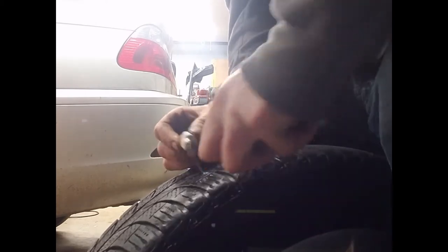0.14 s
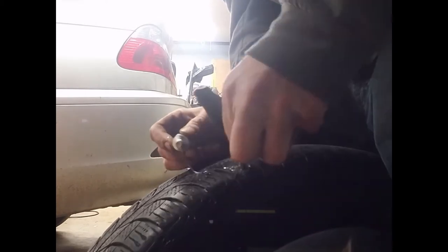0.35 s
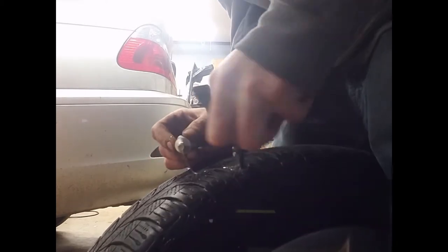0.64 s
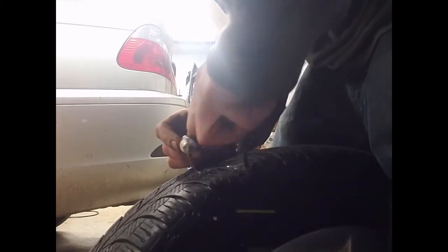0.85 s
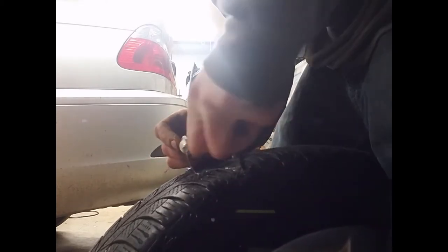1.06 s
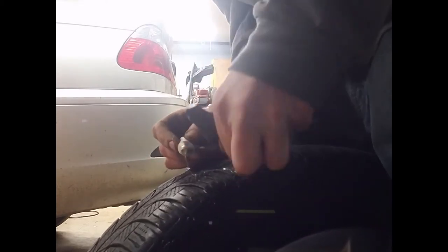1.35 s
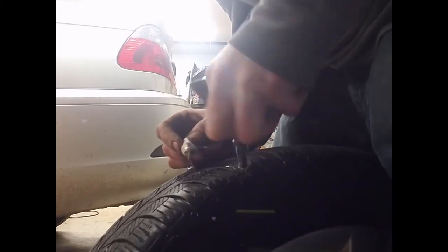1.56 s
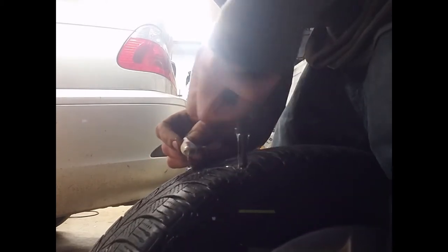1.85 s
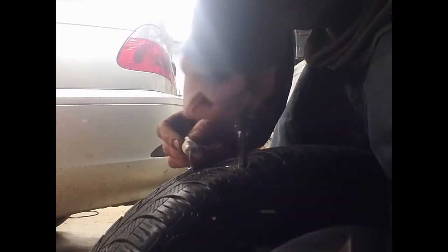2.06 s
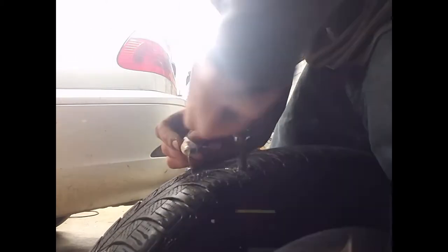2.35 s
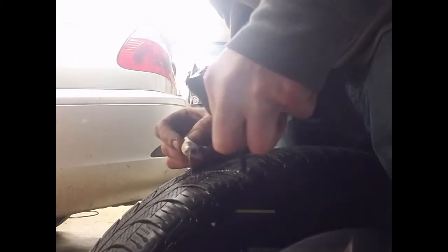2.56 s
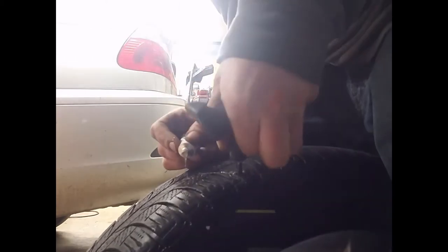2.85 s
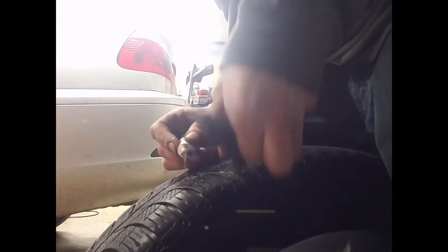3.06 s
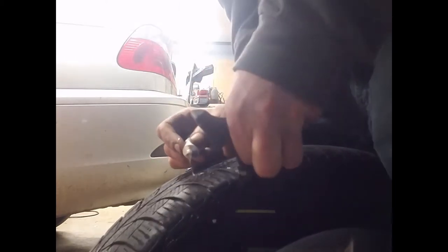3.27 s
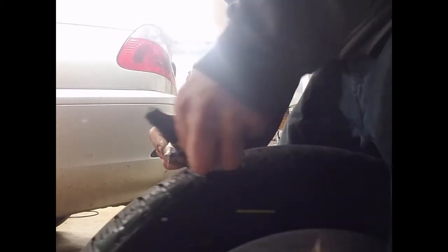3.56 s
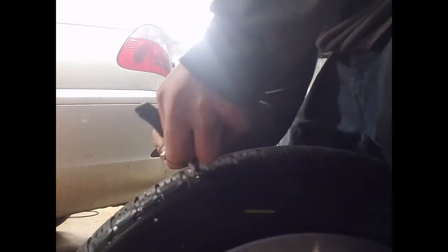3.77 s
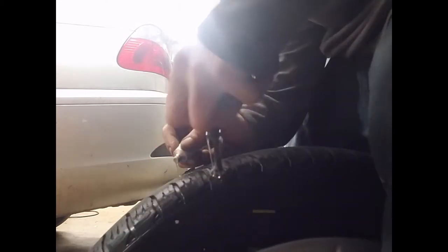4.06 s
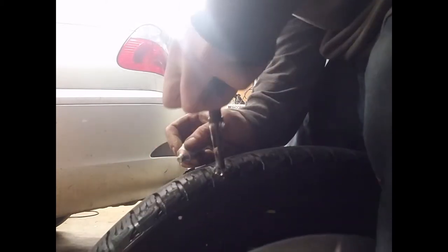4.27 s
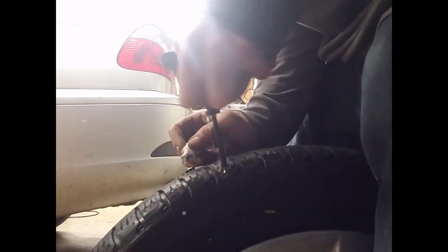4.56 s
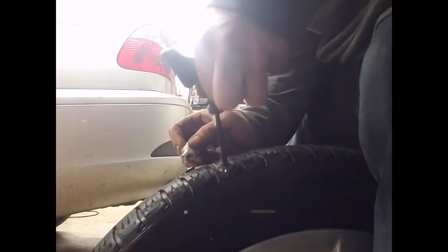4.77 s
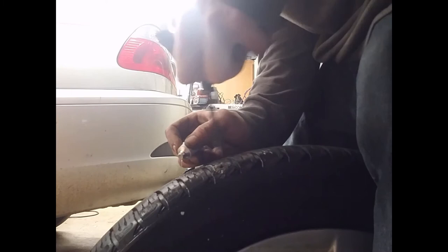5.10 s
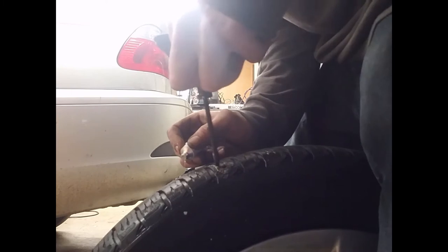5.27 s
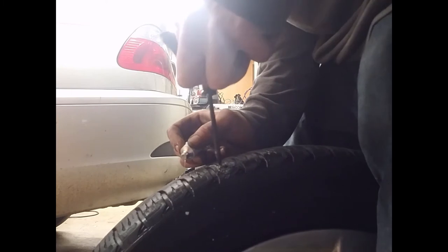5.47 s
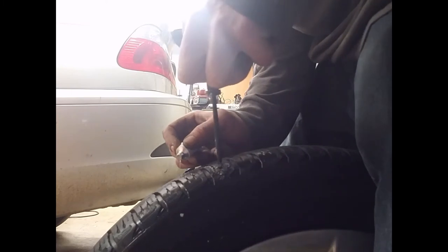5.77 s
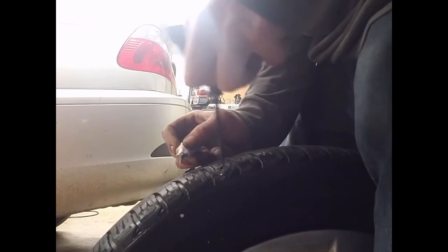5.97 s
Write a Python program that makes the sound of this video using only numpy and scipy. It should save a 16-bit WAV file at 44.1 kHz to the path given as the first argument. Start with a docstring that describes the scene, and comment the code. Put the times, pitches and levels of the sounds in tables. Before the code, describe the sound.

Air fizzes and spurts from a punctured tire as a tool twists in the hole, knocks hard, then settles into a rushing hiss.

```python
"""Outdoors, two microphone ports: air already fizzes and whistles from a punctured tire around a rasp tool.
As the tool is pushed and twisted the gap spurts, whistles and is pinched; from 1.2 s its teeth knock the tire.
Near 2.9 s hard knocks come with a low rush and a jolt that leaves the air ring singing; at 4.2 s the teeth
leave the hole and the flutter calms; from 4.8 s the wide gap rushes on to the end.
The jet is filtered noise in three bands, whistles are gliding tones, knocks and carcass excite tire modes."""
import sys
import numpy as np
from scipy import signal
from scipy.fft import rfft, irfft, next_fast_len
from scipy.io import wavfile
from scipy.ndimage import uniform_filter1d, map_coordinates

SR = 44100
rng = np.random.default_rng(int(sys.argv[2]) if len(sys.argv) > 2 else 0)


def file_out(sig):
    """Save sig as 16-bit WAV at sys.argv[1]."""
    # one column per channel
    cols = np.atleast_2d(sig).T
    # limit, then scale
    lim = np.clip(cols, -1, 1)
    pcm = np.round(lim * 32767).astype(np.int16)
    wavfile.write(sys.argv[1], SR, pcm)


N = 270553
TIME = np.arange(N) / SR  # s
GRID = next_fast_len(N + SR // 4)  # FFT length, padded for the tails
HZ = np.fft.rfftfreq(GRID, 1 / SR)

# low rush of the jet through the wide side of the gap, before wobble: t/s, level/dB
RUSH_LEVELS = [(0, -42.5), (.11, -43.5), (.25, -52), (.5, -53.5), (.95, -53.5), (1.02, -42), (1.07, -42),
               (1.1, -45), (1.23, -53), (1.265, -41), (1.31, -45.5), (1.41, -49), (1.65, -57),
               (1.88, -51.5), (2.1, -56.5), (2.19, -46), (2.33, -39.5), (2.37, -45.5), (2.64, -43.5),
               (2.86, -45.5), (2.93, -27.5), (2.97, -29.5), (3.01, -31), (3.07, -43.5), (3.11, -48),
               (3.5, -44.5), (3.8, -45.5), (3.93, -48), (4.38, -53.5), (4.68, -51.5), (4.752, -46),
               (4.764, -37), (4.785, -28.5), (4.82, -32), (4.855, -31), (4.9, -34), (4.98, -31.5),
               (5.17, -37), (5.6, -34.5), (5.74, -34), (5.78, -36), (5.8, -40), (5.83, -33), (6, -35.5),
               (6.14, -34)]


def amp(db):
    """Gain of a level in dB."""
    return 10 ** (np.asarray(db) / 20)


def unit(x):
    """Scale so that the mean of the channels has rms 1."""
    return x / np.sqrt(np.mean(np.atleast_2d(x).mean(0) ** 2))


def along(points):
    """Columns of (Hz, value, ..) rows on the log frequency grid."""
    hz, *columns = np.transpose(points)
    return np.array([np.interp(np.log(HZ + 1), np.log(hz + 1), column) for column in columns])


def curves(rows):
    """One value per sample for each column after the time."""
    s, *columns = np.transpose(rows)
    return [np.interp(TIME, s, column) for column in columns]


def wobble(rate):
    """A smooth random curve, rate knots a second."""
    knots = rng.standard_normal(int(N * rate / SR) + 4)
    return map_coordinates(knots, [TIME * rate])


def filtered(x, response):
    """x times a complex response on the frequency grid."""
    return irfft(rfft(x, GRID) * response, GRID)[..., :N]


def band(low_hz, high_hz):
    """Soft-edged pass band."""
    low_edge = 1 + (low_hz / (HZ + 1)) ** 6
    high_edge = 1 + (HZ / high_hz) ** 6
    return 1 / np.sqrt(low_edge * high_edge)


def panned(x, left_db):
    """Tilt a sound between the ports; positive dB leans left."""
    return x * amp(np.array([[.5], [-.5]]) * left_db)


def tire(low_hz, high_hz):
    """Causal response of the tire's modes between two frequencies, as resonators of alternating sign."""
    # carcass and air ring: f/Hz, width/Hz, level/dB
    modes = [(92.6, 26, -4), (144.6, 34, -0.5), (224.7, 6.3, -1.5), (370.6, 43, 11), (529, 16.5, 10),
             (747, 55, 4.5), (1133, 30, 0.5), (1532, 34, 0.5), (1966, 200, -2.5)]
    response = 0
    for k, (hz, width_hz, db) in enumerate(modes):
        if low_hz < hz < high_hz:
            damping = 1j * HZ * width_hz
            response = response + (-1) ** k * amp(db) * damping / (hz * hz - HZ * HZ + damping)
    return response


def scatter(level_db, t60):
    """Direct path plus near reflections off tread, hands and car body, different at each port, weak in bass."""
    left_lead_s = 6e-5  # these paths reach the left port first
    t = TIME[:SR // 8]
    tail = rng.standard_normal((2, len(t))) * amp(-60 * t / t60)
    tail /= np.linalg.norm(tail, axis=1, keepdims=True)
    strength = amp(level_db) * band(1860, SR)
    echoes = rfft(tail, GRID) * strength
    lead = np.exp(1j * np.pi * HZ * left_lead_s * np.array([[1], [-1]]))
    return lead * (1 + echoes) / np.sqrt(1 + strength ** 2)


def field(shape, bins_size, frames_size):
    """A random gain field of unit spread, smoothed over frequency bins and time frames."""
    smooth = uniform_filter1d(rng.standard_normal(shape), bins_size, axis=-2)
    smooth = uniform_filter1d(smooth, frames_size, axis=-1)
    return smooth / smooth.std()


def turbulence(colour, paths, patchy_db, streak_db):
    """Stereo noise: eddies come in patches, and moving hands shift narrow streaks of reflection.
    A common part takes the fixed paths, the rest is diffuse."""
    # how alike the two ports hear it: f/Hz, common share of power/1
    alike = [(400, 0.35), (1000, 0.44), (2000, 0.42), (4500, 0.62), (12000, 0.47), (15000, 0.64)]
    z = signal.stft(rng.standard_normal((3, N)), nperseg=512)[2]
    patches = patchy_db * field(z.shape[1:], bins_size=12, frames_size=4)
    streaks = streak_db * field(z.shape[1:], bins_size=2, frames_size=40)
    noise = signal.istft(z * amp(patches + streaks), nperseg=512)[1][:, :N]
    spectrum = rfft(noise, GRID)
    share = np.clip(along(alike), 0, 1)
    common = spectrum[0] * paths * np.sqrt(share)
    diffuse = spectrum[1:] * np.sqrt(1 - share)
    return unit(irfft(colour * (common + diffuse), GRID)[:, :N])


def jet(paths):
    """Three sizes of eddy share one gap; spurts and flutter lift the small eddies most."""
    # jet through the tight side of the gap, before spurts and flutter: t/s, fizz level/dB
    fizz_levels = [(0, -19.5), (.11, -30.5), (.21, -28.5), (.71, -26.5), (.95, -28), (1.01, -24),
                   (1.065, -25), (1.08, -17), (1.19, -15), (1.23, -20.5), (1.3, -30), (1.49, -28.5),
                   (1.65, -33), (1.76, -32), (1.88, -23.5), (2.08, -24), (2.19, -27), (2.54, -28.5),
                   (2.58, -33), (2.77, -25), (2.875, -27.5), (2.885, -17), (2.94, -26), (2.965, -16.5),
                   (3.06, -26), (3.15, -24), (3.21, -17.5), (3.35, -27), (3.62, -32), (3.66, -24.5),
                   (3.71, -23), (3.8, -25), (3.93, -24), (4.02, -23), (4.08, -29), (4.13, -26), (4.38, -25),
                   (4.75, -28), (4.79, -16), (4.92, -20.5), (6.14, -20.5)]
    # the hiss stands out or sinks between rush and fizz: t/s, level/dB
    hiss_offsets = [(0, 5), (.15, 3), (.4, -4.5), (1, -1.5), (1.25, 1), (1.29, -1.5), (1.32, -6.5),
                    (1.4, -8), (2.1, -3), (2.5, -2.5), (2.9, -4), (3.03, 6.5), (3.3, -5), (3.7, -6),
                    (4.4, -1.5), (4.82, -2.5), (6.14, -3.5)]
    # the jet swings and hands shade it: t/s, fizz toward left/dB, hiss toward left/dB
    aim = [(0, 8.5, 1.5), (.7, 9.5, -1), (1.2, 6.5, 1.5), (1.6, 9, 1), (2.4, 13, 0), (3.2, 3.5, 2.5),
           (3.5, 6.5, 1), (4.6, 7.5, 1.5), (6.14, 8.5, 1.5)]
    # the gap is squeezed for a moment: centre t/s, length/s, depth/dB
    pinches = [(0.9, 0.19, 5), (2.593, 0.11, 5), (2.699, 0.13, 11), (2.83, .05, 3.5), (3.007, 0.075, 8.5),
               (3.105, 0.061, 4.5), (4.47, 0.086, 4), (4.567, 0.057, 4), (4.647, 0.054, 3)]
    # the gap jerks open: t/s, rise before onset and fall/dB
    spurts = [(.196, 3.5), (0.59, 7), (.657, 4), (1.076, 6), (1.12, 2), (1.172, 1.5), (1.188, 4),
              (1.354, 2.5), (1.549, 5.5), (2.317, 7.5), (2.381, 1), (2.468, 7), (2.529, 6), (2.879, 0),
              (2.948, 6), (3.165, 7), (3.27, 6), (3.846, 5), (3.697, 3.5), (4.036, 6), (4.109, 3),
              (4.18, 0), (4.257, 2.5), (4.776, 7.5), (4.848, 6)]
    # relative colour of the jet at the microphone ports: f/Hz, left level/dB, right level/dB
    port_colour = [(254, -16, -20), (470, -28, -15), (1245, -10, -8), (2220, -13, -5.5), (2820, -6.5, -3),
                   (4400, -11.5, -3), (5200, -8.5, -0.5), (6400, -7.5, -10), (7970, -8, 0), (9200, -9, -6),
                   (10200, -9, 0), (10750, -7, 5), (11300, -8, 6), (12000, -4, -1), (13000, 0, -4),
                   (14000, 5.5, -4), (14620, 6.5, .5), (14750, -1, .5), (15000, 4.5, 1.5), (15400, 7.5, 6),
                   (15700, 6.5, 3.5)]
    hiss_share = 0.45  # the hiss lies between rush and fizz: weight of the rush
    pulled_out_s = 4.2  # the tool's teeth leave the hole and the flutter calms
    spurt_rise_s, spurt_fall_s = 0.00055, .018

    (fizz_db,), (rush_db,) = curves(fizz_levels), curves(RUSH_LEVELS)
    hiss_db = hiss_share * rush_db + (1 - hiss_share) * fizz_db + curves(hiss_offsets)[0]
    fizz_left, hiss_left = curves(aim)

    flow_db = 0.25 * wobble(20)
    for s, length, depth_db in pinches:
        squeeze = np.cos(np.pi * np.clip((TIME - s) / length, -.5, .5)).clip(0)
        flow_db -= depth_db * squeeze ** 1.66

    # rubber lips flutter against the teeth of the tool
    spurt_db = np.where(TIME < pulled_out_s, 1.5, .8) * wobble(85)
    t = TIME[:SR // 4]
    spurt_shape = np.exp(-t / spurt_fall_s) * (1 - np.exp(-t / spurt_rise_s))
    for s, rise_db in spurts:
        spurt_db[round(s * SR):][:len(t)] += rise_db * spurt_shape

    ports = amp(along(port_colour))
    fizz = turbulence(ports * band(8900, SR), paths, patchy_db=1.0, streak_db=2.0)
    hiss = turbulence(ports * band(3320, 9660), paths, patchy_db=1.5, streak_db=2.5)
    # the low rush also drives the tire's modes
    body = ports * band(110, 4500) * (1 + 2.0 * np.abs(tire(450, 2500)))
    rush = turbulence(body, paths, patchy_db=1.0, streak_db=0.07)

    fizz_db += spurt_db
    hiss_db += 0.39 * spurt_db + 0.66 * wobble(16)
    rush_db += 0.68 * spurt_db + 1.1 * wobble(22)
    eddies = amp(fizz_db) * panned(fizz, fizz_left)
    eddies += amp(hiss_db) * panned(hiss, hiss_left)
    eddies += amp(rush_db) * panned(rush, hiss_left)
    return amp(flow_db) * eddies


def whistles():
    """A slit beside the tool gives gliding tones of abrupt start; size and phase wander as fast as the blur."""
    # t/s, length/s, start f/Hz, end f/Hz, blur/Hz, level before wander/dB, toward left/dB
    slit_tones = [(0, 0.012, 4330, 4300, 300, -33, -14), (0.059, 0.023, 4400, 4480, 400, -40, -11),
                  (0.08, 0.058, 3950, 3700, 400, -41.5, -16), (0.104, 0.076, 7930, 7660, 610, -40, -7),
                  (0.137, 0.028, 3800, 3930, 161, -33.5, -18), (0.213, 0.036, 3730, 3830, 248, -36, -17),
                  (0.578, 0.016, 9500, 9100, 400, -41, -14), (0.591, 0.04, 8560, 8250, 398, -33, -11),
                  (0.696, 0.029, 11150, 10200, 494, -20, -12), (0.768, 0.008, 8800, 8700, 500, -34, -7),
                  (1.036, 0.053, 1900, 2600, 1493, -38, -7), (1.07, 0.015, 3320, 4120, 1500, -34, -14),
                  (1.188, 0.042, 8500, 6610, 1510, -27, 6), (3.043, 0.036, 7760, 7730, 597, -34, -3),
                  (4.716, 0.023, 10500, 10200, 200, -42, -10)]
    out = np.zeros((2, N))
    for s, length, start_hz, end_hz, blur_hz, db, left_db in slit_tones:
        u = np.linspace(0, 1, round(length * SR))  # progress through the tone
        waver = 0.0089 * map_coordinates(rng.standard_normal(20), [u * length * 150])
        glide_hz = end_hz + (start_hz - end_hz) * (1 - u) ** 3
        phase = 2 * np.pi * np.cumsum(glide_hz * (1 + waver)) / SR
        wander = rng.standard_normal((2, 200))
        in_phase, quadrature = [map_coordinates(knots, [u * length * blur_hz]) for knots in wander]
        tone = (0.67 + in_phase) * np.sin(phase) + quadrature * np.cos(phase)
        envelope = np.abs(np.sin(np.pi * u ** 0.51)) ** 0.55
        out[:, round(s * SR):][:, :len(u)] += panned(amp(db) * envelope * tone, left_db)
    return out


def carcass():
    """The rush keeps the low modes murmuring, jolts swell them; the air ring sings on after a hard jolt."""
    # hands jolt the tire: peak t/s, carcass level/dB
    jolt_levels = [(.07, -55), (.71, -75), (1.08, -56), (1.31, -67), (1.39, -48), (2.02, -70),
                   (2.46, -50.5), (2.949, -39.5), (3.29, -59), (3.62, -56), (3.7, -51), (3.86, -43),
                   (4.06, -49.5), (4.78, -58)]
    # the air ring sings on after a jolt: t/s, f/Hz, level before onset and decay/dB, t60/s
    air_ring = [(2.985, 222, -41, 1.1), (1.38, 222, -58, .8)]
    jolt_rise_s, jolt_fall_s = 0.034, 0.046
    murmur_db, follows = -61, 0.5  # level at the mean rush level; dB per dB of rush
    sidewall_db, sidewall_jolt_db = -13, -10.5  # relative to the rush; relative to a jolt

    rush_db, = curves(RUSH_LEVELS)
    jolts = np.zeros(N)
    for s, db in jolt_levels:
        distance = np.where(TIME < s, (s - TIME) / jolt_rise_s, (TIME - s) / jolt_fall_s)
        jolts += amp(db) * np.exp(-distance)
    low_gain = amp(murmur_db + follows * (rush_db - rush_db.mean())) + jolts
    wall_gain = amp(sidewall_db + rush_db) + amp(sidewall_jolt_db) * jolts

    # lumpy noise: one common part and one part for each port
    lumps = amp(2.16 * wobble(25)) * rng.standard_normal((2, 3, N))
    low = filtered(lumps[0, 0] + 0.46 * lumps[0, 1:], tire(50, 300) + 0.15 * band(46, 340))
    wall = filtered(lumps[1, 0] + .5 * lumps[1, 1:], tire(300, 450))

    ring = np.zeros(N)
    for s, hz, db, t60 in air_ring:
        t = np.clip(TIME - s, 0, 9)
        envelope = amp(db - 60 * t / t60) * (1 - np.exp(-t / 0.0078))
        ring += envelope * np.sin(2 * np.pi * hz * t)
    return panned(low_gain * unit(low), -2.7) + panned(wall_gain * unit(wall), -5.0) + ring


def surroundings():
    """A faint, unsteady outdoor rumble and hiss: shaped noise, partly common to both ports."""
    # relative spectral level: f/Hz, level/dB
    floor_colour = [(20, -4), (45, -1), (100, -16), (250, -8), (600, -11.5), (2000, -40), (9000, -33)]
    noise = rng.standard_normal((3, N))
    ambience = filtered(0.75 * noise[0] + noise[1:], amp(along(floor_colour)))
    return amp(-70.0 + 1.5 * wobble(5.0)) * unit(ambience)


def knocks(paths):
    """Each catch is a short rough burst: it clicks in the tread at its own pitch and thuds in the carcass."""
    # teeth of the tool catch on the tire: t/s, click level/dB, thud relative to click/dB, click f/Hz
    catches = [(1.192, -28, -11, 805), (2.918, -20.5, -5.5, 940), (2.927, -15, -14, 1210),
               (2.946, -19, -13, 2620), (2.962, -20, -20, 2690), (3.485, -28.5, -21, 2820),
               (3.698, -30.5, -13.5, 1400), (3.733, -33.5, -9.5, 1310), (3.761, -31, -14, 1530),
               (3.774, -28, -34, 1640), (3.801, -25, -32, 1560), (3.805, -26.5, -32, 2340),
               (3.826, -31.5, -19, 1930)]
    click_t60_s, thud_t60_s = .021, 0.017
    thud_lift_db = 21.5  # drive added to every thud ahead of the tire's modes
    clicks, thuds, t = np.zeros(N), np.zeros(N), TIME[:SR // 25]
    for s, db, thud_db, hz in catches:
        burst = rng.choice([-1, 1], size=len(t))
        tick = np.sin(2 * np.pi * hz * t + .2 * np.cumsum(burst)) + .8 * burst
        start = round(s * SR)
        clicks[start:][:len(t)] += amp(db - 60 * t / click_t60_s) * tick
        thuds[start:][:len(t)] += amp(db + thud_db + thud_lift_db - 60 * t / thud_t60_s) * burst
    click = filtered(clicks, (0.5 + 0.54 * paths) * band(820, 5100))
    thud = filtered(thuds, tire(50, 600) + 0.13 * band(70, 490))
    return panned(click, -1.7) + panned(thud, -6.5)


def scene():
    """All sources at the two microphone ports."""
    paths = scatter(level_db=-1.5, t60=0.08)
    return jet(paths) + whistles() + carcass() + surroundings() + knocks(paths)


def record(dry):
    """The loudest peaks are squeezed, then a very steep low-pass sets the band limit."""
    top_hz = 15730
    squeezed = dry / (1 + np.abs(dry / .85) ** 4) ** (1 / 4)
    return filtered(squeezed, 1 / (1 + (HZ / top_hz) ** 600))


dry = scene()
out = record(dry)
file_out(out)
```